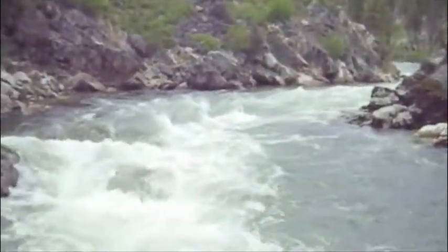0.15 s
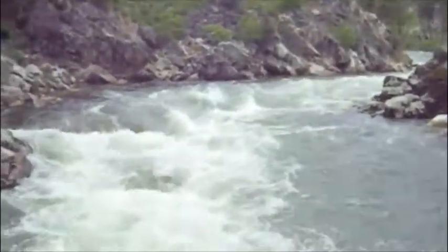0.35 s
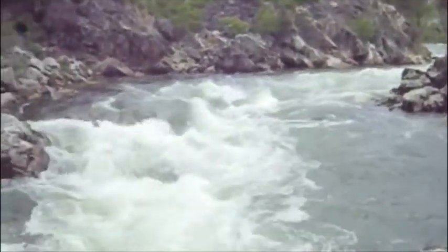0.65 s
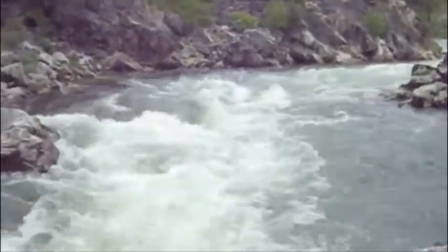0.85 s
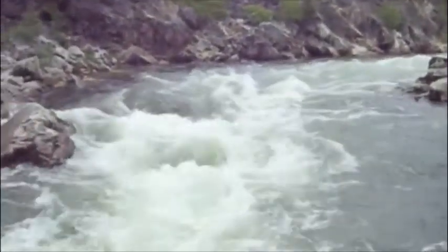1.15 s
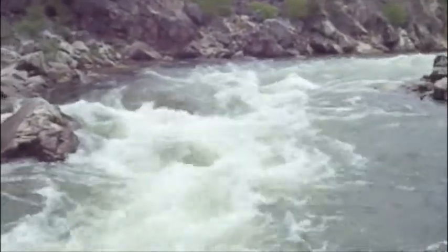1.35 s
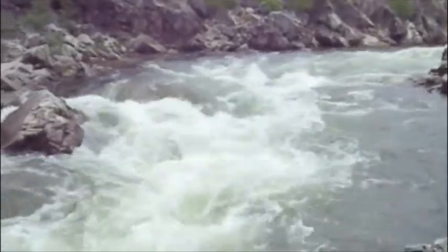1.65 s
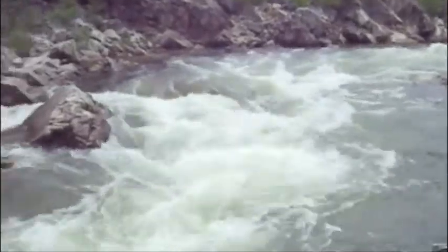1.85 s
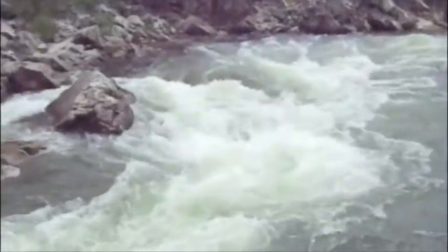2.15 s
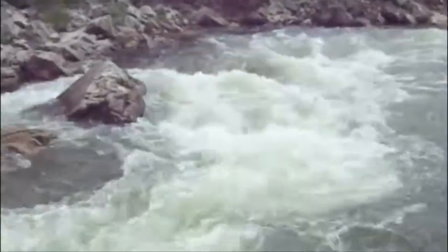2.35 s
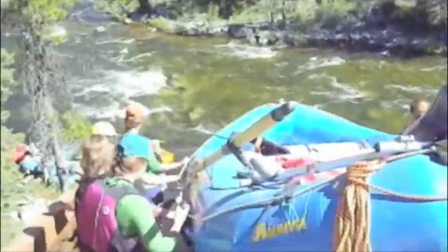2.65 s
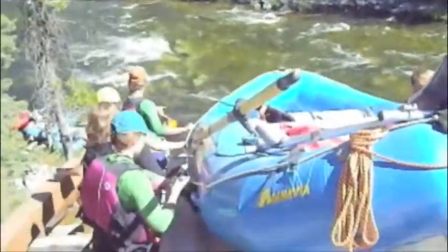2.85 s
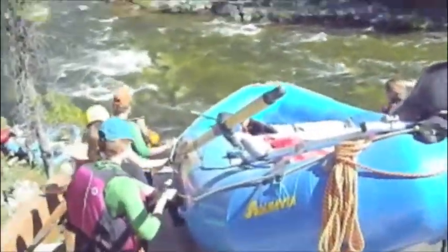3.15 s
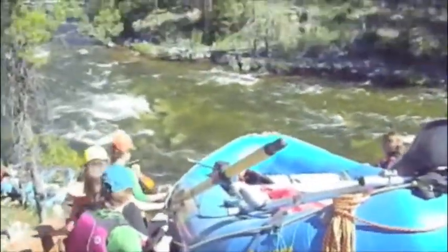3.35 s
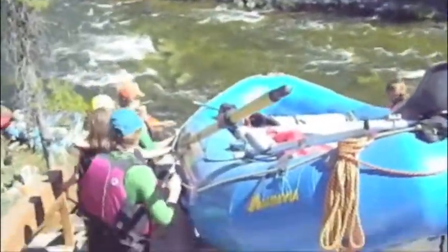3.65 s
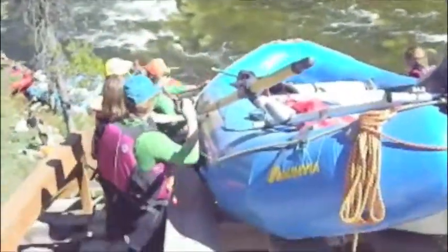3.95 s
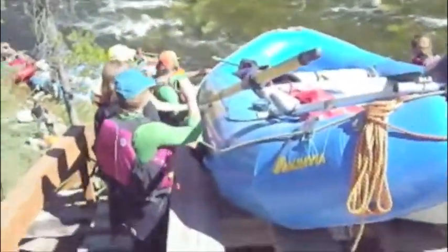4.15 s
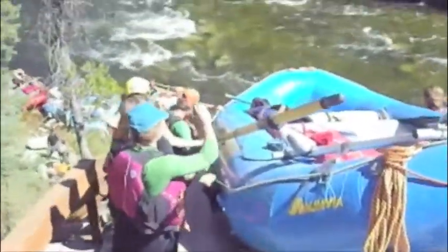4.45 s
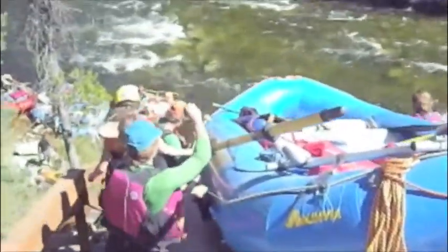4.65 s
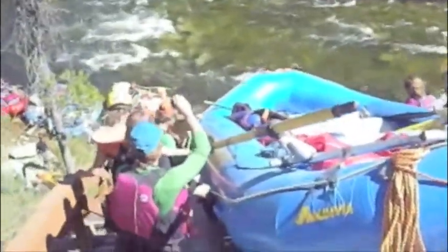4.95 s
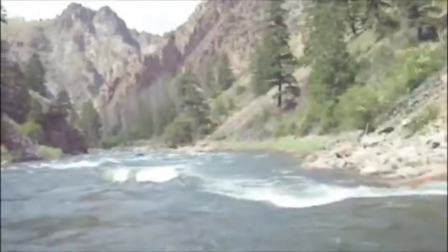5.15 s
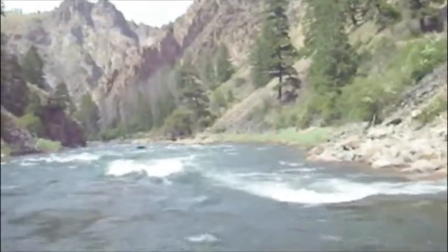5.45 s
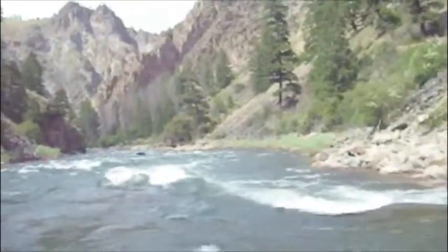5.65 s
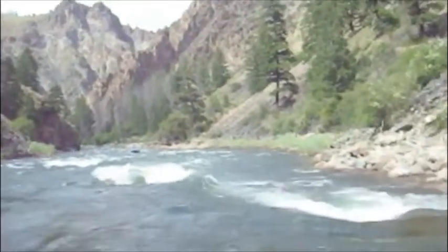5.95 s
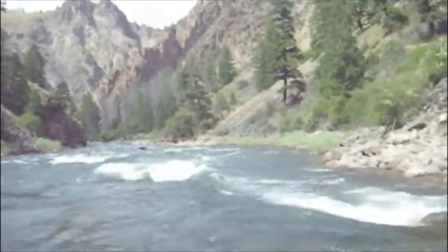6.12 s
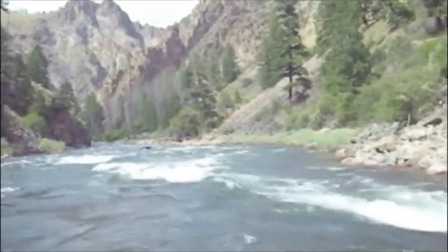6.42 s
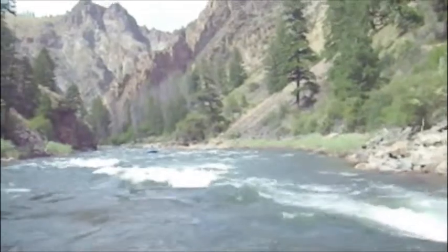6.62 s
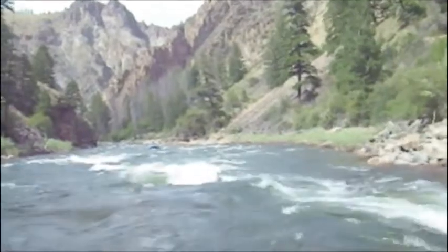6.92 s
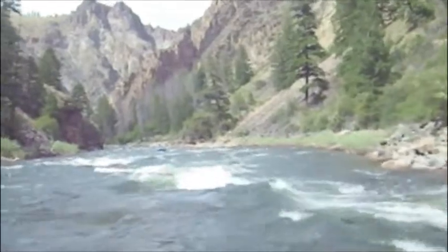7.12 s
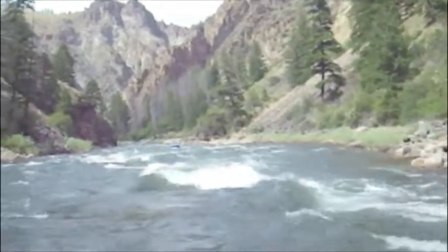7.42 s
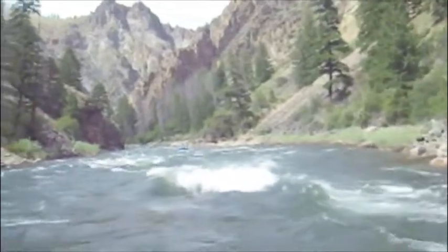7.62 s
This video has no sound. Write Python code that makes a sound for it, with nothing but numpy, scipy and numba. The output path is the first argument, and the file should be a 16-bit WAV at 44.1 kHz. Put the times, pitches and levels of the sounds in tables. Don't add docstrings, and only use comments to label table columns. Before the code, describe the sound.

Loud churning rapids, then a softer river while an inflated raft is dragged and knocked, then fresh rapids swelling with droplets slapping nearby.

```python
import sys
import numpy as np
from scipy import signal
from scipy.fft import rfft, irfft, next_fast_len
from scipy.io import wavfile
from scipy.ndimage import uniform_filter1d
from numba import njit

SR = 44100
rng = np.random.default_rng(int(sys.argv[2]) if len(sys.argv) > 2 else 0)


def file_out(sig):
    cols = np.atleast_2d(sig).T
    lim = np.clip(cols, -1, 1)
    pcm = np.round(lim * 32767).astype(np.int16)
    wavfile.write(sys.argv[1], SR, pcm)


def makeup_ratio(level_db):
    decades = np.asarray(level_db, float) / 20
    return 10 ** decades


N = 343098

# (frequency [Hz], level [dB per Hz])
RAPID_BODY = [(41, -53), (70, -25), (104, -17), (215, -8.5), (380, -8), (403, -9), (609, -2.5), (957, -3),
              (1310, -6), (1630, -3), (2020, -7.5), (2460, -8.5), (5090, -5.5), (6580, -11), (7700, -23.5),
              (10000, -48), (16900, -120)]
RAMP_BODY = [(110, -19), (260, -11), (400, -6), (600, -4.5), (760, -2.5), (950, -5.5), (1300, -7.5),
             (1600, -6.5), (1800, -5.5), (2050, -10), (2900, -12), (7100, -12.5), (7700, -19), (10000, -45)]
AFLOAT_BODY = [(41, -54), (70, -24.5), (166, -9), (300, -5.5), (351, -7), (445, -3.5), (560, -1), (690, -2),
               (800, -4.5), (1650, -6), (1940, -9), (3120, -7), (3950, -12.5), (5000, -8.5), (6330, -14.5),
               (7700, -25.5), (10000, -55), (16900, -120)]
# (frequency [Hz], level [dB per Hz])
RAPID_TREBLE = [(4760, -32), (8100, -1), (8630, -1.5), (11100, -5), (13500, -12), (14100, -15),
                (14800, -38)]
RAMP_TREBLE = [(4760, -30), (8100, 1), (8520, -1.5), (8960, -7.5), (9670, -4), (9970, -4), (11700, -12),
               (14800, -21)]
AFLOAT_TREBLE = [(4760, -30), (8100, 1.5), (8380, -4), (9890, -10.5), (11600, -10.5), (13600, -19),
                 (14600, -26)]
# (wind rumble [dB], treble [dB], bubbles [per s], bubble share [dB],
# flicker [dB], throb of the whole sound [dB])
PLACES = [
    (-14, -21.5, 7000, -6, 0.37, -0.28),
    (6.5, -21, 5000, -7, 0.2, .5),
    (-11, -24, 5000, -8.5, 0.6, 0.04),
]
# (level [dB], gain while drawing nearer [dB], time to draw near [s])
NEARING = [
    (-11.5, -0.26, 1.1),
    (-23, -2.06, 1.1),
    (-19.5, 3.5, 1.11),
]
# (deep roar [dB], spray [dB], mist [dB])
BALANCES = [
    (0.56, 0.38, 0),
    (0, -0.15, .3),
    (-3.5, -0.56, -.3),
]
# (time [s], fade out [s], fade in [s])
JOINS = [
    (2.478, 0.1, 0.1),
    (5.047, 0.098, 0.089),
]
# (time [s], wave [dB], volume step [dB], recovery [s])
DUCKS = [
    (1.09, -1, -1, 0.52),
    (2.207, 3.5, -4, .5),
    (5.242, 2.5, -2.5, 0.14),
]
# (time [s], peak [dB], ring [Hz], fall by 60 dB [s], crack [dB])
KNOCKS = [
    (2.8533, -9, 770, 0.019, 3),
    (2.8785, -9.5, 850, .035, -1),
    (4.371, -14, 900, 0.022, -7),
]
# (time [s], peak [dB])
TICKS = [
    (4.4024, -13),
    (4.4124, -17),
    (4.4244, -18),
]
# (frequency [Hz], level [dB], fall by 60 dB [s])
BUCKLE_TONES = [(7300, 1, .025), (9500, -1.5, .025), (11600, -13, .012), (14100, -16, .012),
                (5300, 3, .012)]
# (time [s], peak [dB], centre [Hz], splinter of treble [dB])
DROPS = [(4.2034, -7, 3060, -37), (4.651, -12, 2320, -30), (5.169, -2, 5200, -45), (5.188, -9, 3400, -45),
         (5.205, -14, 3100, -41.5), (5.238, -2, 3400, -24), (5.240, -12, 4900, -40), (5.303, -2, 3400, -36),
         (5.339, -10, 3450, -45), (5.455, -6, 1500, -45), (5.462, -12, 3400, -45), (5.494, -11, 5000, -40),
         (5.949, -9, 3100, -32), (7.59, -14, 5000, -14)]
# (time [s], length [s], from [Hz], to [Hz], level [dB])
SQUEAKS = [
    (3.048, .06, 1630, 1550, -27),
    (3.143, 0.04, 810, 880, -25),
    (3.264, 0.068, 1510, 1640, -33),
    (4.005, .08, 1410, 1490, -32),
    (4.012, 0.032, 1230, 1240, -26),
]
# (start [s], length [s], lowest [Hz], highest [Hz], level [dB], scatter [dB],
# fall by 60 dB [s])
SPATTER = (5.12, .55, 1300, 5600, -26, 9, .014)


def unit(x):
    return x / np.sqrt(np.mean(x ** 2))


def walk(rate, size):
    held = np.repeat(rng.standard_normal(int(size * rate / SR) + 2), 8)
    slewed = uniform_filter1d(uniform_filter1d(held, size=8), size=8)
    quick = unit(slewed - uniform_filter1d(slewed, size=40))
    return np.interp(np.arange(size) * (8 * rate / SR), np.arange(len(held)), quick)


@njit
def add(out, start, hz, decay, glide, size):
    for k in range(len(start)):
        turn = 2 * np.pi * hz[k] / SR
        z = size[k] + 0j
        p = decay[k] * np.exp(1j * turn)
        bend = np.exp(1j * turn * (glide[k] - 1))
        end = min(len(out), int(start[k] - 5.8 / np.log(decay[k])))
        for i in range(int(start[k]), end):
            out[i] += z.imag
            z *= p
            p *= bend


def ring(s, hz, t60, db):
    out = np.zeros(N)
    s, hz, t60, db = np.broadcast_arrays(s, hz, t60, db)
    decay = np.exp(-np.log(1000) / (t60.ravel() * SR))
    add(out, s.ravel() * SR, 1. * hz.ravel(), decay, np.ones(s.size), makeup_ratio(db.ravel()))
    return out


def hull():
    start_s, attack_s, release_s, level_db = 2.48, 0.43, 0.2, -25.5
    t = np.arange(N) / SR
    since = np.clip(t - start_s, 0, None)
    swell = np.clip(since / attack_s, 0, 1) * np.exp(-np.clip(since - attack_s, 0, None) / release_s)
    boards = signal.butter(2, (450, 1880), "band", fs=SR, output="sos")
    scrape = unit(signal.sosfilt(boards, rng.standard_normal(N)))
    out = scrape * swell * makeup_ratio(level_db + 2.0 * walk(25.34, N))
    for s, length, from_hz, to_hz, db in SQUEAKS:
        part = np.clip((t - s) / length, 0, 1)
        pitch_hz = from_hz + (to_hz - from_hz) * part
        out = out + makeup_ratio(db) * np.sin(np.pi * part) * np.sin(2 * np.pi * np.cumsum(pitch_hz) / SR)
    return out


def spatter(count=70):
    start, length, low_hz, high_hz, db, scatter_db, t60 = SPATTER
    when, pitch, force = rng.random((count, 3)).T
    hz = low_hz * (high_hz / low_hz) ** pitch
    rings = ring(start + length * when ** 1.5, hz, t60, db + scatter_db * force)
    return uniform_filter1d(rings, size=4)


def drops():
    s, db, hz, treble_db = np.array(DROPS).T
    slap = ring(s[:, None], hz[:, None] * [.85, 1, 1.2], [.014, .012, .009], db[:, None] + [-7, -7, -8])
    splinter_db = (db + treble_db)[:, None] + [9, 5, 0, -3, -6]
    splinter = ring(s[:, None], [6140, 8800, 10500, 12100, 13800], 0.004, splinter_db)
    return uniform_filter1d(uniform_filter1d(slap, size=3), size=4) + splinter


def raft():
    s, db, hz, t60, crack_db = np.array(KNOCKS).T
    cracks_db = (db + crack_db)[:, None] + [0, 0, -3, -3, -5]
    cracks = ring(s[:, None], [1650, 2350, 3100, 4100, 5300], .009, cracks_db)
    knocks = uniform_filter1d(ring(s, hz, t60, db) + cracks, size=4)
    when, tick_db = np.array(TICKS).T
    tone, tone_db, tone_t60 = np.array(BUCKLE_TONES).T
    return knocks + ring(when[:, None], tone, tone_t60, tick_db[:, None] + tone_db - 11.0)


def bubbles(rate, size):
    when, pitch, life, force = rng.random((int(12000 * size / SR), 4)).T
    used = slice(0, int(np.clip(rate, 100, 12000) * size / SR))
    hz = 150 * 90 ** pitch
    samples = (3.65 + 10.9 * life) * SR / hz
    loud = hz * makeup_ratio(8.2 * force)
    decay, glide = np.exp(-3 / samples), 1 + 0.23 / samples
    out = np.zeros(size)
    add(out, (when * size)[used], hz[used], decay[used], glide[used], loud[used])
    return unit(out)


def colour(hz, points):
    at, db = np.transpose(points)
    return makeup_ratio(np.interp(np.log(hz + 1), np.log(at), db, left=db[0], right=-200))


def water(t, nearing, balance, body, treble, wind_db, treble_db, rate, bubble_db, flicker_db, throb_db):
    level_db, gain_db, near_s = nearing
    nearer_db = gain_db * (1 - np.exp(-t / near_s))
    roar_db = balance[0] + 0.85 * nearer_db + .8 * walk(4, len(t))
    spray_db = balance[1] + 0.61 * nearer_db + .3 * walk(4, len(t))
    mist_db = balance[2] + .2 * nearer_db + .35 * walk(4, len(t))

    size = next_fast_len(len(t))
    hz = np.arange(size // 2 + 1) * SR / size
    shape = np.where(hz < 7920, colour(hz, body), makeup_ratio(treble_db) * colour(hz, treble))
    wind = makeup_ratio(wind_db) * hz / 8 / (1 + hz / 8) / (1 + (hz / 24) ** 2.3)
    hiss = rng.standard_normal(size) + makeup_ratio(bubble_db) * bubbles(rate, size)
    churn = rfft(hiss) * np.hypot(shape, wind)
    churn /= np.std(irfft(churn, size))

    octave = np.log2(hz / 1000 + 1e-9)
    out, surge = 0, walk(14, len(t))
    for centre in np.arange(-6, 4.5, .5):
        band = irfft(churn * np.clip(1 - np.abs(octave - centre) * 2, 0, 1), size)[:len(t)]
        surge = .8 * surge + .6 * walk(14, len(t))
        tilt_db = roar_db * np.clip(-centre / 1.5, 0, 1) + spray_db * np.clip(centre - 1, 0, 1)
        tilt_db = tilt_db + mist_db * (centre > 3)
        depth_db = flicker_db * np.clip(1 + centre / 5, .2, 1)
        out = out + band * makeup_ratio(tilt_db + depth_db * (surge + .6 * walk(30, len(t))))
    return out * makeup_ratio(level_db + nearer_db + throb_db * walk(22, len(t)))


def river():
    edges = [0] + [int(join[0] * SR) for join in JOINS] + [N]
    bodies = (RAPID_BODY, RAMP_BODY, AFLOAT_BODY)
    trebles = (RAPID_TREBLE, RAMP_TREBLE, AFLOAT_TREBLE)
    parts = []
    for k, place in enumerate(PLACES):
        t = np.arange(edges[k + 1] - edges[k]) / SR
        parts.append(water(t, NEARING[k], BALANCES[k], bodies[k], trebles[k], *place))
    return np.concatenate(parts)


def scene():
    no_thump = signal.butter(2, 450, "high", fs=SR, output="sos")
    hits = signal.sosfilt(no_thump, raft() + drops() + spatter())
    return np.tile(river() + hits + hull(), (2, 1))


def low_pass(x):
    return signal.sosfilt(signal.butter(12, 15000, fs=SR, output="sos"), x)


def record(dry):
    t = np.arange(N) / SR
    volume_db = 0
    for s, wave_db, step_db, recovery_s in DUCKS:
        wave = wave_db * np.exp(-np.abs(t - s) / 0.029)
        dip = step_db * np.exp(-np.abs(t - s) / recovery_s)
        volume_db = volume_db + np.where(t > s, dip, wave)
    fade = 1
    for s, fade_out, fade_in in JOINS:
        fade = fade * np.clip(np.maximum((s - t) / fade_out, (t - s) / fade_in), 0, 1) ** 0.94
    x = dry * makeup_ratio(volume_db)
    x = x / (1 + np.abs(x / .85) ** 4) ** .25
    notch_hz, notch_width_hz = 7920, 300
    edges_hz = [notch_hz - notch_width_hz / 2, notch_hz + notch_width_hz / 2]
    notch = signal.butter(2, edges_hz, "bandstop", fs=SR, output="sos")
    top = signal.butter(12, 14350, fs=SR, output="sos")
    mix = fade * signal.sosfilt(np.vstack([notch, top]), x)
    return low_pass(mix)


dry = scene()
out = record(dry)
file_out(out)
```